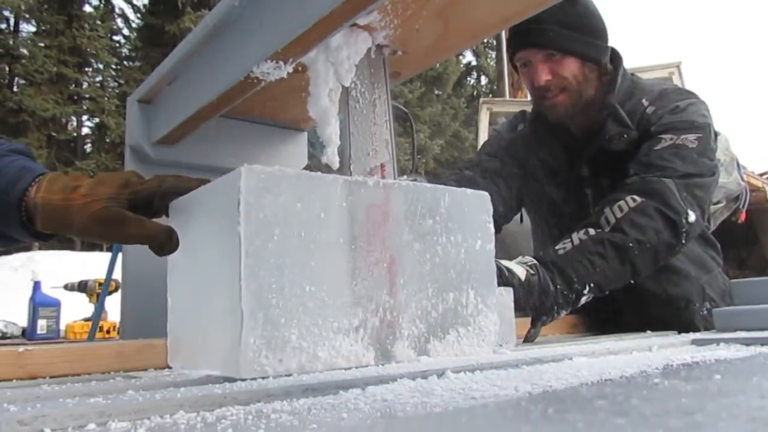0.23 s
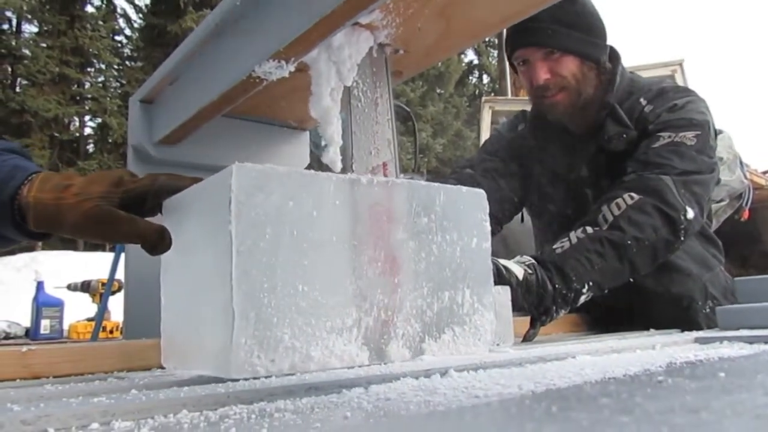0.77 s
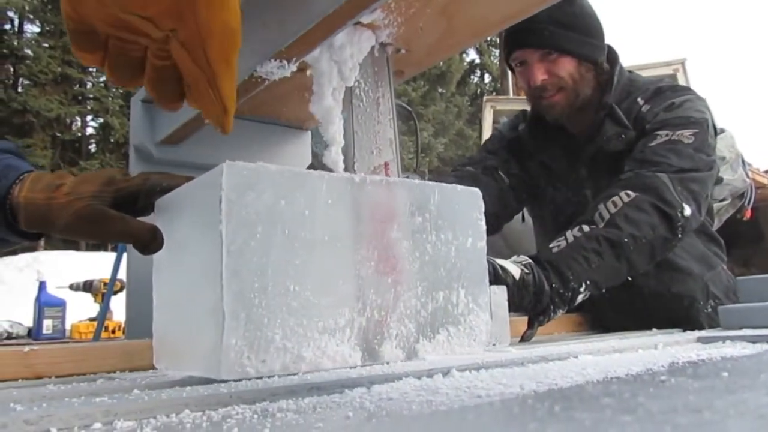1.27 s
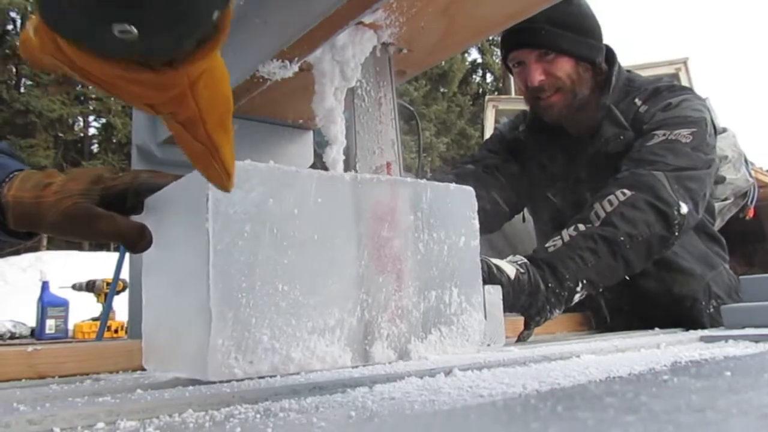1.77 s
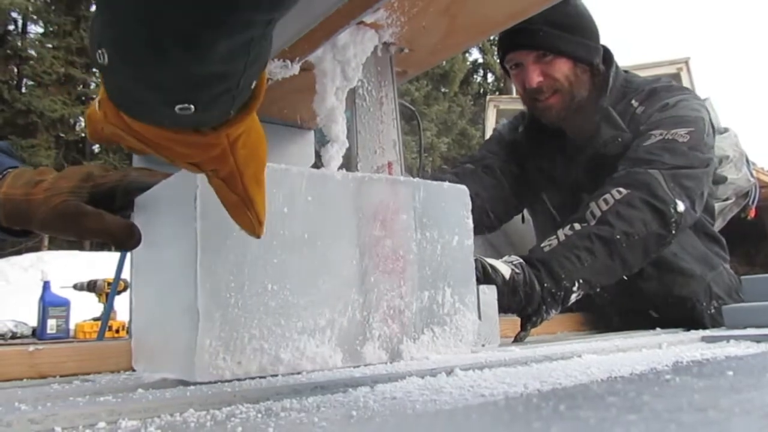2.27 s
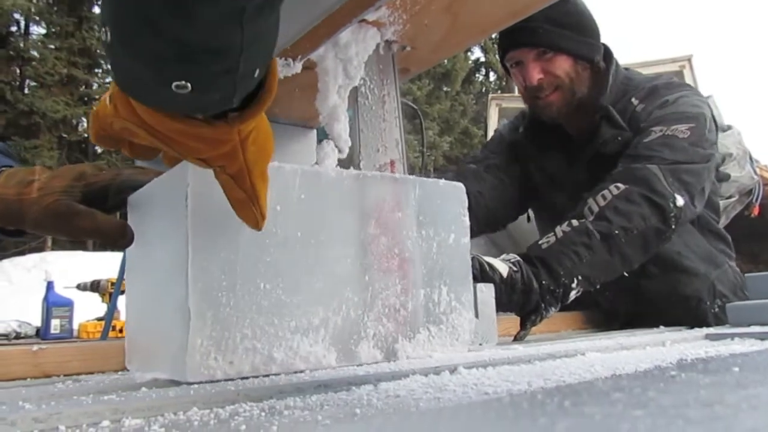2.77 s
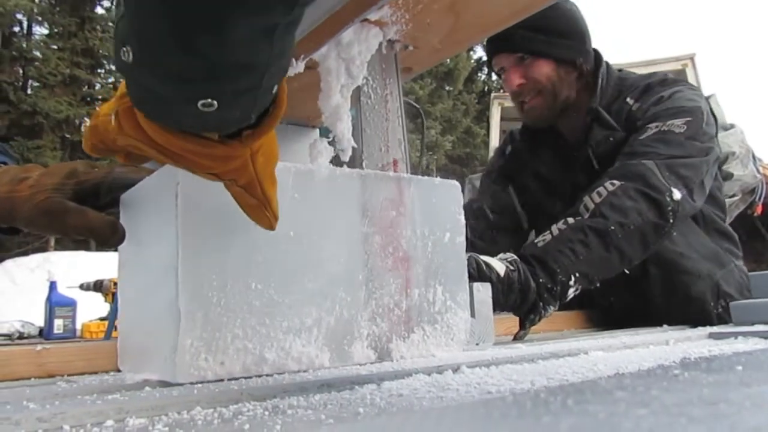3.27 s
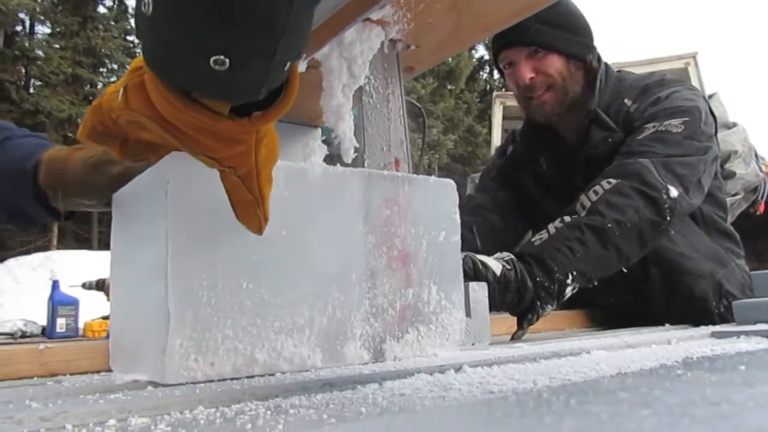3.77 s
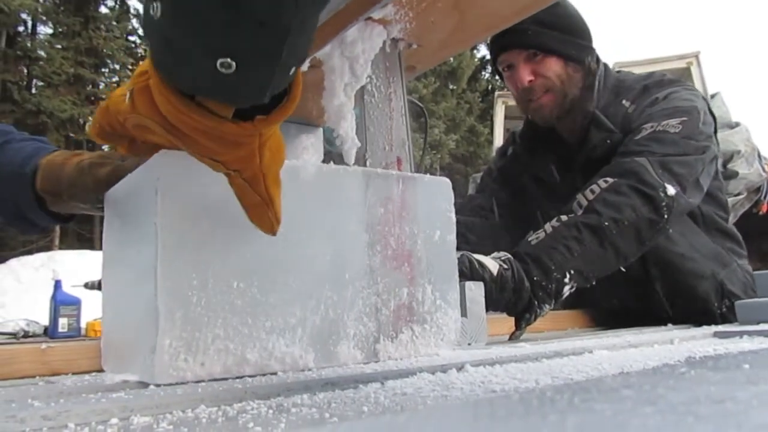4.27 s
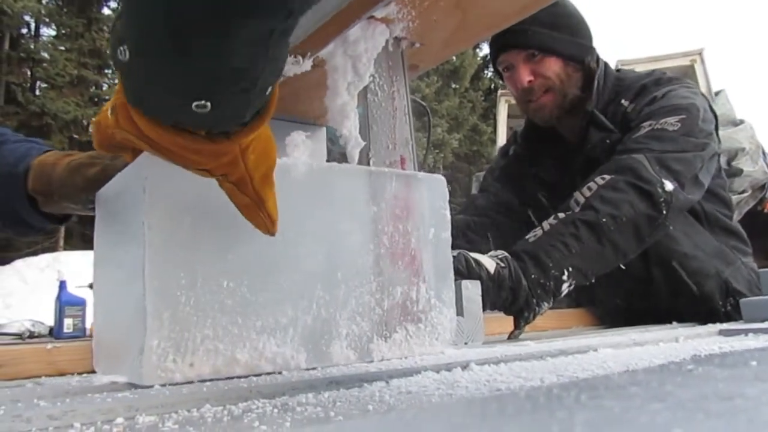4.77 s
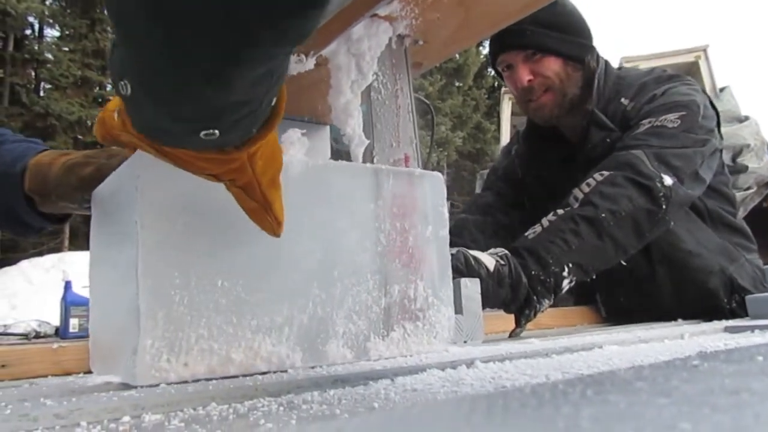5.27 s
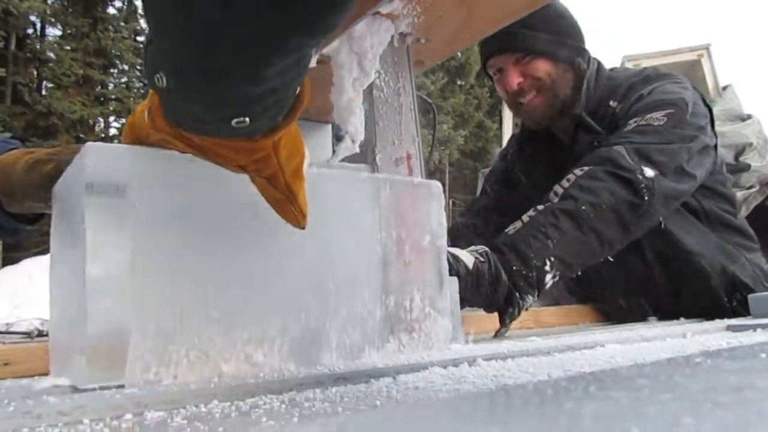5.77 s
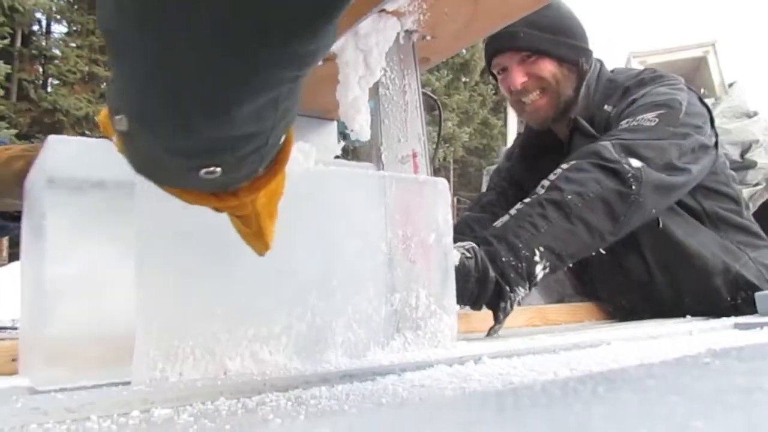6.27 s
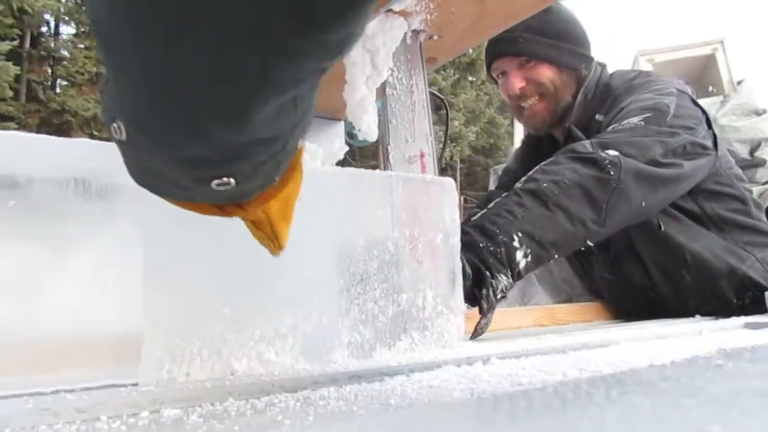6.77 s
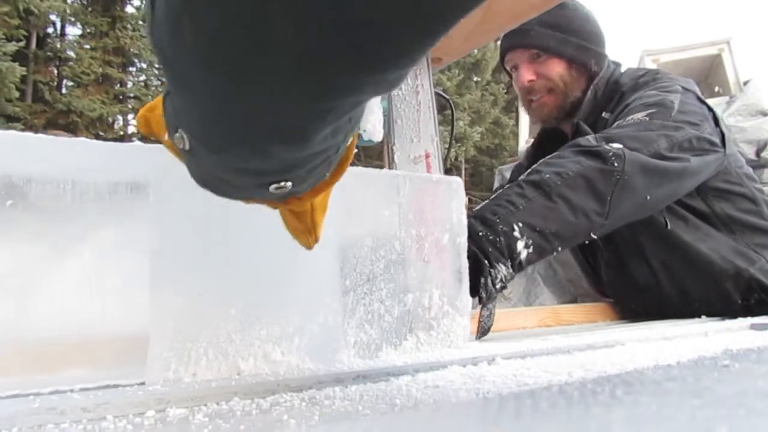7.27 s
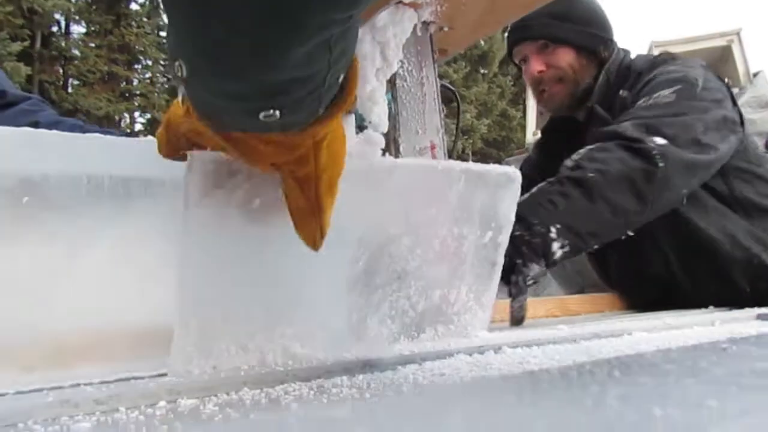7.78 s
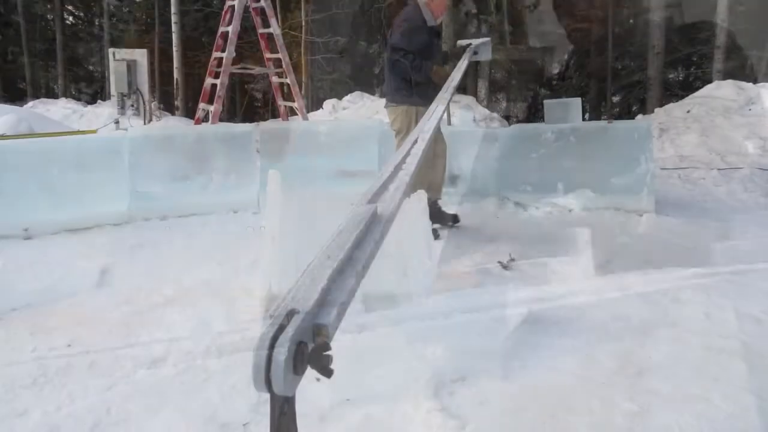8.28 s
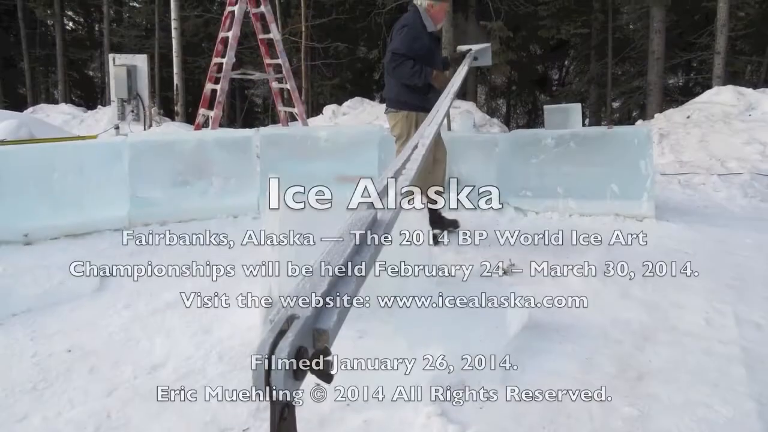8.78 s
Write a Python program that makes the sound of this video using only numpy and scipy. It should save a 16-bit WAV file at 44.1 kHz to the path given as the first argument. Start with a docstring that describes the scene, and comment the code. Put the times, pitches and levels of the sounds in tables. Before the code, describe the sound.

An electric chainsaw whines and rips through a block of ice outdoors, the slab thuds free, the motor coasts down, then ice scrapes and knocks.

```python
"""An electric chainsaw, mounted upright in a rig outdoors, rips a slab off a block of ice close to the listener.
Orders of motor and sprocket whine through the rig's resonances, random clicks of the chain ring the rig,
and cut ice chips hiss. The slab comes free with a thud of decaying modes; the motor is switched off and
coasts down, its lines sliding through the resonances of the bar. Last, the ice is shoved and knocked along
the metal table, with rumble, stick-slip scraping and short blows, and the sound fades to silence."""
import sys
import numpy as np
from scipy import signal
from scipy.fft import rfft, irfft, next_fast_len
from scipy.io import wavfile

SR = 44100
rng = np.random.default_rng(int(sys.argv[2]) if len(sys.argv) > 2 else 0)


def put_to_file(sound):
    """Save the sound as 16-bit audio at rate SR, in the file named by the first command-line argument."""
    columns = np.atleast_2d(sound).T  # one column per channel
    safe = np.clip(columns, -1, 1)
    whole_steps = np.round(safe * 32767)
    wavfile.write(sys.argv[1], SR, whole_steps.astype(np.int16))


N = 398223
TIME = np.arange(N) / SR

FREE_S = 5.56  # the chain leaves the ice
SLIDE_S, SLIDE_RISE_S = 7.23, 0.5  # the block begins to slide away, and the time its sound takes to build
WORK_HZ = 175  # reference motor speed, turns per second
COAST_KNEE_HZ = 54  # motor speed below which the free saw fades

# Spectrum of ice chips. Each row: frequency in Hz, relative density in dB per Hz.
CHIP_SPECTRUM = [(300, -20), (1000, 5), (2200, 3.5), (2900, -2), (3400, 1), (3900, 1), (4400, 3),
                 (5300, 2.5), (6200, -3.5), (7200, 2), (8300, -1.5), (10000, -1.5), (12300, -2.5),
                 (14500, -20.5)]
# Ring of knocked or scraped ice. Each row: frequency in Hz, width in Hz, relative level in dB.
ICE_RING = [(655, 140, 4.5), (940, 80, 6.5), (1220, 110, 3), (1674, 120, 1.5), (1880, 76, -3.5),
            (2080, 65, -2), (2435, 39, -3), (2910, 150, -8.5), (3440, 70, -8.5), (4570, 90, -12),
            (5190, 110, -16.5)]
# Shoves of the block. Each row: centre in seconds, half length in seconds, scrape in dB, rumble in dB.
BLOCK_SHOVES = [(2.922, 0.083, -33, -27.5), (7.406, 0.025, -34, -47), (7.509, 0.21, -52, -40),
                (7.746, 0.018, -35.5, -37), (7.89, 0.083, -38.5, -41), (8.141, 0.011, -33, -35.5)]


def undb(db):
    """Level and amplitude: decibels become a gain."""
    return 10 ** (np.asarray(db) / 20)


def unit(x):
    """Normalization of power: scale to rms 1."""
    return x / np.sqrt(np.mean(x ** 2))


def curves(rows):
    """Linear interpolation in time of each column of a table after the first."""
    s, *columns = np.transpose(rows)
    return [np.interp(TIME, s, c) for c in columns]


def gain_at(points, hz):
    """Gain of a (Hz, dB) spectrum, interpolated over logarithmic frequency."""
    f, db = np.transpose(points)
    return undb(np.interp(np.log(hz + 1e-3), np.log(f), db))


def filtered(x, response):
    """Linear filtering: the spectrum of x is multiplied by a response given as a function of frequency."""
    size = next_fast_len(x.shape[-1] + 4096)
    spectrum = rfft(x, size) * response(np.fft.rfftfreq(size, 1 / SR))
    return irfft(spectrum, size)[..., :x.shape[-1]]


def colour(x, points):
    """Spectral shaping by a (Hz, dB) table, at rms 1."""
    return unit(filtered(x, lambda f: gain_at(points, f)))


def resonance(f, hz, width):
    """Response of a damped resonator: a band-pass with gain 1 at the centre."""
    return 1j * f * width / (hz ** 2 - f ** 2 + 1j * f * width)


def ringing(x, modes, lowest_hz):
    """Modal superposition: (Hz, width, dB) resonators that radiate little below lowest_hz, at rms 1."""
    def response(f):
        body = 0
        for k, (hz, width, db) in enumerate(modes):
            body = body + (-1) ** k * undb(db) * resonance(f, hz, width)  # neighbours in opposite phase
        return body * f ** 2 / (f ** 2 + lowest_hz ** 2)
    return unit(filtered(x, response))


def passing(hz, modes):
    """Power sum of (Hz, width, dB) resonances, as the gain of a line that slides through them."""
    return np.sqrt(sum(np.abs(undb(db) * resonance(hz, centre, width)) ** 2 for centre, width, db in modes))


def walk(rate):
    """Slow random modulation: chance values, rate per second, joined by lines, with a spread near 1."""
    knots = rng.standard_normal(4096)
    return 1.102 * np.interp(TIME * rate, np.arange(len(knots)), knots)


def grains(per_s, scatter_db):
    """Shot noise: two unrelated streams of randomly timed clicks of uneven size."""
    sizes = undb(scatter_db * rng.uniform(-1.4, 1, (2, N)))
    struck = rng.random((2, N)) < per_s / SR
    return unit(struck * rng.standard_normal((2, N)) * sizes)


def spread(pair):
    """Mid and side: two unrelated signals become left and right, alike in the bass and wide in the treble."""
    # Each row: frequency in Hz, side minus mid in dB.
    side_levels = [(100, -22.5), (300, -18.5), (600, -12.5), (1200, -12), (2500, -6), (5000, -7.5),
                   (9000, -5.5), (14000, -2.5)]
    side = filtered(pair[1], lambda f: gain_at(side_levels, f))
    return np.array([pair[0] + side, pair[0] - side])


def ramp(start_s, length_s):
    """Linear envelope from 0 to 1."""
    return np.clip((TIME - start_s) / length_s, 0, 1)


def swell(s, half_s):
    """Gaussian envelope: a smooth rise and fall around a moment."""
    return np.exp(-((TIME - s) / half_s) ** 2)


def knee(hz, knee_hz):
    """Second-order roll-off with motor speed: near 1 at speed, dying away as the motor stops."""
    return hz ** 2 / (hz ** 2 + knee_hz ** 2)


def freed(exit_s=0.02):
    """Crossfade of load: 0 while the chain cuts, 1 once it has left the ice."""
    return ramp(FREE_S - exit_s / 2, exit_s)


def speed(hunt=0.001505):
    """Motor under varying load: it sags when pushed, races when freed, coasts to rest and hunts in the cut."""
    # Each row: time in seconds, motor turns per second.
    speed_points = [(0.0, 171.5), (.12, 174), (.46, 172.5), (.86, 177), (1.0, 177), (1.31, 174),
                    (1.42, 165.5), (1.55, 166), (1.82, 175.5), (1.95, 174), (2.07, 168.5), (2.3, 178.5),
                    (2.54, 179.5), (2.84, 173), (2.94, 168.5), (3.07, 168), (3.17, 173), (3.31, 177),
                    (3.8, 175.5), (4.22, 178.5), (4.39, 176), (4.78, 176), (4.92, 179.5), (5.15, 178.5),
                    (5.49, 172), (5.56, 173), (5.714, 185.5), (5.8, 178.5), (5.87, 167), (6.056, 148),
                    (6.486, 96.5), (6.554, 92), (6.802, 70.5), (7.034, 52.5), (7.2, 39), (7.45, 22),
                    (7.8, 1)]
    return curves(speed_points)[0] * (1 + hunt * walk(14) * (1 - freed()))


def effort(cutting, idle, sliding_db):
    """Power addition: gain of a noise made by the cut, then the free chain, joined by the sliding block."""
    sliding = undb(sliding_db) * ramp(SLIDE_S, SLIDE_RISE_S)
    return np.hypot(cutting + (idle - cutting) * freed(), sliding)


def partial(turns, order, waver_db, blur, sway):
    """Order of rotation: a sine locked to the motor, its level, phase and place shaken by the load."""
    phase = 2 * np.pi * order * turns + blur * walk(45)
    line = np.sqrt(2) * np.sin(phase) * undb(waver_db * walk(9))
    return line * (1 + sway * walk(6.2) * np.array([[1], [-1]]))


def table(hz, shudder_db=0.5):
    """Forced vibration: the metal table rumbles under the saw, the sliding block and each shove."""
    # Each row: frequency in Hz, relative density in dB per Hz.
    rumble_spectrum = [(20, -33.5), (45, -18.5), (65, -4.5), (85, 3), (120, 2.5), (180, -1.5), (250, 5),
                       (450, -3.5), (900, -45)]
    cutting_db, idle_db, slide_db = -35.5, -41.5, -41.5
    saw = undb(cutting_db) * (1 - freed()) + undb(idle_db) * freed() * knee(hz, COAST_KNEE_HZ)
    block = undb(slide_db) * ramp(SLIDE_S, SLIDE_RISE_S)
    block = block + sum(undb(db) * swell(s, half_s) for s, half_s, _, db in BLOCK_SHOVES)
    rumble = spread(colour(rng.standard_normal((2, N)), rumble_spectrum))
    return rumble * np.hypot(saw, block) * undb(shudder_db * walk(11))


def scrape(fitful_db=2.0, creep_db=-50, grit_db=-18):
    """Stick-slip friction: the block slips on frost, each slip rings the ice and crushed crystals crackle."""
    push = undb(creep_db) * ramp(SLIDE_S, SLIDE_RISE_S)
    push = push + sum(undb(db) * swell(s, half_s) for s, half_s, db, _ in BLOCK_SHOVES)
    crumbs = ringing(grains(650, scatter_db=-2.0), ICE_RING, lowest_hz=393)
    grit = undb(grit_db) * colour(grains(400, scatter_db=0), CHIP_SPECTRUM)
    return spread(crumbs + grit) * push * undb(fitful_db * walk(50))


def knocks(clack_s=0.0081, tick_s=0.0048, push_s=0.002, crush_s=0.0008, tick_width=0.45):
    """Impact excitation: each blow rings the block's modes, with a hard clack and a tick of splintering ice."""
    # Ice against ice and table. Each row: start in seconds, thud in dB, clack in dB, tick in dB,
    # upper edge of the thud in Hz, centre of the tick in Hz.
    blows = [(1.401, -18, -15, -43, 350, 3500), (5.044, -27, -14, -42, 400, 5000),
             (5.561, -15, -31, -52, 400, 5000), (5.567, -15, -35, -54, 350, 5000),
             (5.573, -2.5, -17, -48, 1300, 3000), (5.584, -24, -21, -47, 1205, 2500),
             (5.598, -11, -35, -52, 700, 5000), (5.621, -36, -20, -45, 685, 5000),
             (5.757, -21, -12.5, -23, 1530, 5100), (6.779, -48, -42, -31, 600, 9000),
             (6.86, -37, -29, -32, 600, 4970), (7.386, -47.5, -25, -42, 894, 6000),
             (7.395, -31.5, -19, -44, 1200, 6000), (7.425, -45, -25, -39, 890, 5000),
             (7.435, -49, -37, -39, 891, 8000), (7.457, -45, -26, -42, 890, 5000),
             (7.499, -49, -32, -38, 602, 9000), (7.532, -47.5, -40, -50, 606, 5000),
             (7.609, -42.5, -40, -44, 598, 3500), (7.659, -45, -38, -55, 600, 5000),
             (7.71, -18, -57, -60, 90, 5000), (7.738, -27.5, -39, -35, 127, 2600),
             (7.75, -23.5, -37, -35, 110, 2800), (7.922, -14.5, -35.5, -42, 218, 5000),
             (7.944, -20, -42, -52, 250, 5000), (8.103, -48, -38, -39, 600, 3500),
             (8.136, -21, -23.5, -38, 710, 5000), (8.145, -7.5, -30, -35, 560, 8500),
             (8.157, -17.5, -47, -44, 300, 9000), (8.169, -17, -42, -42, 220, 5000),
             (8.229, -41, -48, -47, 400, 7000), (8.244, -47, -42, -45, 400, 6000)]
    # Block on the table. Each row: frequency in Hz, level in dB, time to decay by 60 dB in seconds;
    # level and frequency are the middle of a random scatter.
    block_modes = [(82, -15, .16), (110, -9.5, .14), (143.2, -4, 0.16), (180, 0, 0.1), (244, 2.5, 0.1),
                   (340, 6, 0.061), (393, 8.5, 0.04), (548, 0.5, 0.068), (683, -4, 0.045),
                   (1150, -10, 0.04)]
    thuds, clack = np.zeros((2, N))
    ticks = np.zeros((2, N))
    t = TIME[:SR // 4]
    hz, mode_db, t60 = np.transpose(block_modes)[:, :, None]
    for s, thud_db, clack_db, tick_db, edge_hz, tick_hz in blows:
        size, detune = rng.standard_normal((2, len(hz), 1))
        weight = undb(mode_db + 4.2 * size) / (1 + (hz / edge_hz) ** 2)  # a soft bump reaches only the low modes
        decay = np.exp(-np.log(1000) * t / t60)
        ring = weight * np.sin(2 * np.pi * hz * (1 + 0.041 * detune) * t) * decay
        thud = ring.sum(0) / np.linalg.norm(weight) * (1 - np.exp(-t / push_s))
        noise = rng.standard_normal((2, len(t)))
        splinter = unit(filtered(noise, lambda f: resonance(f, tick_hz, tick_width * tick_hz)))
        span = slice(int(s * SR), int(s * SR) + len(t))
        thuds[span] -= undb(thud_db) * thud
        clack[span] += undb(clack_db) * np.exp(-t / clack_s) * (1 - np.exp(-t / crush_s))
        ticks[:, span] += undb(tick_db) * np.exp(-t / tick_s) * splinter
    # the table radiates little deep bass
    thuds = signal.sosfilt(signal.butter(2, 75, "highpass", fs=SR, output="sos"), thuds)
    ice = ringing(rng.standard_normal((2, N)), ICE_RING, lowest_hz=300)
    return thuds + spread(clack * ice + ticks)


def spray(turns, turns_per_lap=25.3, lap_depth=0.075, tooth_depth=0.11, dull_db=-5):
    """Modulated shot noise: cutters chip the ice, some bite harder, so the hiss throbs with each chain lap."""
    lap = 2 * np.pi * turns / turns_per_lap
    bite = 1 + lap_depth * (np.cos(lap) + .7 * np.cos(3 * lap))
    teeth = 1 + tooth_depth * np.cos(2 * np.pi * 2 * turns)
    chips = grains(22000, scatter_db=-1) * bite * teeth * undb(0.16 * walk(350))
    chips = colour(chips, CHIP_SPECTRUM)
    # slow cutters and sliding ice give a duller hiss
    slow = ramp(6.1, 2.06)
    dull = filtered(chips, lambda f: gain_at([(5000, 0.88), (12000, dull_db)], f))
    return spread(chips * (1 - slow) + dull * slow)


def chain(turns, slap_depth=0.17):
    """Random impacts on resonators: links slap the bar in uneven bursts and ring the rig."""
    # Bar and rig under the chain. Each row: frequency in Hz, width in Hz, relative level in dB.
    rattle_modes = [(270, 30.3, 8), (307.8, 26.5, 11.5), (518, 87, -2), (675, 96, 1), (881, 47, 3),
                    (976, 90, -1.5), (1175, 640, -10), (1724, 283, -8.5), (2063, 580, -17.5),
                    (2905, 160, -15.5), (3400, 130, -16.5)]
    slap = 1 + slap_depth * np.cos(2 * np.pi * 2 * turns)
    clicks = grains(6000, scatter_db=0.5) * slap * undb(1.0 * walk(40))
    return spread(ringing(clicks, rattle_modes, lowest_hz=198.7))


def whine(hz, turns, knee_hz=70, load_blur=0.26, slack_blur=0.69, return_s=0.23):
    """Housing resonance: the motor's 12th order is a clean note in the cut, rough and faint running free."""
    # Housing in the cut, then running free. Each row: frequency in Hz, width in Hz, level in dB.
    loaded_modes = [(2063, 130, -24.5)]
    free_modes = [(760, 250, -35.5), (1350, 73, -28), (1963, 900, -34.5)]
    # Further level in the cut. Each row: time in seconds, level in dB.
    whine_level = [(0, -1.5), (.17, 5), (.34, -3), (.6, -1.5), (.9, 2.5), (1.2, 1.5), (1.36, 3.5),
                   (1.6, -0.5), (2.15, 1.5), (2.3, -3.5), (2.7, -0.5), (2.89, 1), (3.06, -4.5),
                   (3.18, -1.5), (3.29, -0.5), (3.51, -0.5), (4.5, -1), (4.93, -5), (5.39, 1.5),
                   (5.56, -10)]
    loaded, idle = (passing(12 * hz, modes) for modes in (loaded_modes, free_modes))
    clean = partial(turns, order=12, waver_db=1.5, blur=load_blur, sway=0.31) * undb(curves(whine_level)[0])
    rough = partial(turns, order=12, waver_db=1.2, blur=slack_blur, sway=.13) * undb(1.8 * walk(60))
    return (1 - freed()) * loaded * clean + ramp(FREE_S, return_s) * idle * knee(hz, knee_hz) * rough


def bar(f):
    """Modal interference: the undamped bar has resonances with deep dips between, and little bass."""
    # Each row: frequency in Hz, width in Hz, level in dB.
    bar_modes = [(318, 38, 0.5), (428, 30.2, -15), (528, 31, -7.5), (574, 58, -1), (738, 41.3, -4.5),
                 (870, 60, 1), (1143, 66, -13), (1340, 77, -10), (1660, 150, -10)]
    low_hz, high_hz = 247, 1100  # the bar radiates well only between these
    modes = sum(undb(db) * resonance(f, centre, width) for centre, width, db in bar_modes)
    bass_cut = (f / low_hz) ** 6 / np.hypot(1, (f / low_hz) ** 6)
    return modes * bass_cut / np.hypot(1, (f / high_hz) ** 2)


def coasting(hz, turns, blur=0.25, flutter_db=2.0, jolt_blur=.6, jolt_db=-7):
    """Swept excitation: out of the ice, each order flares in a resonance of the bar and dips between them."""
    # Free drive, led by the sprocket's six teeth.
    # Each row: multiple of the motor's turn, rms level in dB before flutter, fading and bar.
    coast_orders = [(2, -18.5), (3, -19), (4, -35), (6, -12.5), (8, -28.5), (9, -20.5), (15, -22.5),
                    (18, -23), (21, -30)]
    off_s = 5.735  # the motor is switched off
    jolt = 1 - ramp(off_s, 0.28)  # just freed, the chain thrashes and smears the lines
    drive = 0
    for order, db in coast_orders:
        smear = blur * np.sqrt(min(order, 10) / 5) + jolt_blur * jolt
        line = partial(turns, order, waver_db=0.5, blur=smear, sway=0.092)
        drive = drive + undb(db + flutter_db * walk(55)) * line
    return filtered(freed() * knee(hz, COAST_KNEE_HZ) * undb(jolt_db * jolt) * drive, bar)


def motor(hz, turns, blur=0.14, waver_db=1.6, wander_db=1.0):
    """Order excitation: in the cut, lines of motor, gear and sprocket sound through the rig's resonances."""
    # Each row: multiple of the motor's turn, rms level in dB before the rig and the gains below.
    drive_orders = [(.5, -23.5), (1.5, -28.5), (1.8, -25), (2, -25), (3, -22.5), (3.5, -32.5), (4, -28),
                    (5, -32), (6, -19), (8, -24.5), (9, -21), (10, -35.5), (10.5, -36), (14, -28),
                    (15, -32.5), (16, -42.5), (18, -25), (20, -33.5), (21, -36.5), (24, -25.5), (27, -27),
                    (30, -36), (32, -30), (72, -29.5)]
    # How rig and bar radiate. Each row: frequency in Hz, gain in dB.
    rig_response = [(50, -39.5), (88, -17), (110, -19.5), (200, -27.5), (250, -6.5), (305, 2.5), (410, -8),
                    (535, -0.5), (600, -4), (672, -1.5), (715, -6), (890, -4), (1150, -13), (1800, -8.5),
                    (2600, -13), (13000, -8)]
    # The block shifts against the bar and shades three lines.
    # Each row: time in seconds, change in dB of the half order, the 3rd and the sprocket's 6th.
    shading = [(0, -4, -2.5, 2.5), (.2, -1, 0, -1), (.6, -4, -2.5, 1), (1.3, -4, 1.5, 2.5),
               (1.6, -10.5, -1, 3), (2.35, -1, -1.5, -1), (2.8, -5, 0.5, 2.5), (3.1, -4, 0, -2),
               (3.7, 3.5, 1, -5), (4.25, 2.5, 3.5, -0.5), (4.9, -1, -3, 1), (5.35, 1.5, 2, 3),
               (5.6, 0, 2, -6)]
    drive_db, ninth_db_per_hz = -2.5, 0.4
    # once the bar is buried in the ice its highest whistles die away; the 72nd order at this full rate
    buried_from_s, buried_db_per_s = 1.205, -5.5
    half_db, third_db, sixth_db = curves(shading)
    extra_db = {.5: half_db, 3: third_db, 6: sixth_db, 9: ninth_db_per_hz * (hz - WORK_HZ)}
    buried_s = np.maximum(TIME - buried_from_s, 0)
    out = 0
    for order, db in drive_orders:
        comes_and_goes_db = wander_db * walk(1.6) * (order > 13)
        muffled_db = buried_db_per_s * buried_s * np.clip((order - 21) / 51, 0, 1)
        level_db = db + extra_db.get(round(order, 1), 0) + comes_and_goes_db + muffled_db
        smear = blur * np.sqrt(min(order, 10) / 5)
        line = partial(turns, order, waver_db=waver_db, blur=smear, sway=0.084)
        out = out + undb(level_db) * gain_at(rig_response, order * hz) * line
    return undb(drive_db) * (1 - freed()) * out


def scene(feed_db=1.0):
    """Common cause: motor speed drives every part of the saw; uneven feed makes rattle and spray waver."""
    # Ice spray in the cut. Each row: time in seconds, level in dB before the feed's wavering.
    spray_level = [(0, -24), (1.35, -22.5), (1.75, -24), (2.2, -25.5), (2.7, -23.5), (3.15, -25.5),
                   (3.5, -23.5), (4.7, -24.5), (5.5, -24.5)]
    # The chain jerks as it comes to rest. Each row: centre in seconds, half length in seconds, rattle in dB.
    chain_jerks = [(7.466, 0.03, -31.5), (7.614, 0.037, -36.5)]
    # Each row: frequency in Hz, left minus right in dB.
    lean = [(60, -4.5), (110, 4.5), (200, -3), (370, 2), (680, 2), (1260, 3), (2310, -0.5), (4250, 2.5),
            (7820, 1.0), (14400, -1)]
    rattle_db, rattle_idle_db, rattle_knee_hz, slide_ring_db = -24, -24.5, 25.8, -43
    thin_s, thin_length_s, thin_db = 5.11, 1, 2  # the rattle grows as the slab thins
    spray_idle_db, spray_db_per_decade, slide_hiss_db = -29, 25, -54  # free spray follows the chain's speed
    hz = speed()
    turns = np.cumsum(hz) / SR
    feed = undb(feed_db * walk(5))
    jerks = sum(undb(db) * swell(s, half_s) for s, half_s, db in chain_jerks)
    cut_rattle = feed * undb(rattle_db + thin_db * swell(thin_s, thin_length_s))
    free_rattle = undb(rattle_idle_db) * knee(hz, rattle_knee_hz) + jerks
    rattling = effort(cut_rattle, free_rattle, slide_ring_db)
    cut_spray = feed * undb(curves(spray_level)[0])
    free_spray = undb(spray_idle_db) * (hz / WORK_HZ) ** (spray_db_per_decade / 20)
    spraying = effort(cut_spray, free_spray, slide_hiss_db)
    saw = motor(hz, turns) + coasting(hz, turns) + whine(hz, turns)
    saw = saw + rattling * chain(turns) + spraying * spray(turns)
    mix = saw + table(hz) + scrape() + knocks()
    # half of the lean goes to each side
    return filtered(mix, lambda f: gain_at(lean, f) ** np.array([[.5], [-.5]]))


def record(dry, notch_depth=.92):
    """Band limiting: two narrow notches in the treble, a fade to silence and a steep top cut."""
    top_hz = 14500

    def notches(f):
        lower = 1 - notch_depth * resonance(f, 3980, 420)
        upper = 1 - notch_depth * resonance(f, 7940, 290)
        return lower * upper
    fade = np.clip((8.46 - TIME) / 0.36, 0, 1)
    top_cut = signal.ellip(8, .2, 70, top_hz, fs=SR, output="sos")
    return signal.sosfilt(top_cut, filtered(dry, notches) * fade)


dry = scene()
out = record(dry)
put_to_file(out)
```